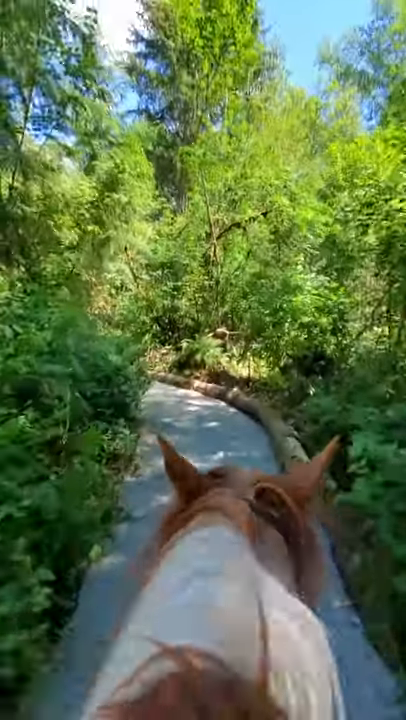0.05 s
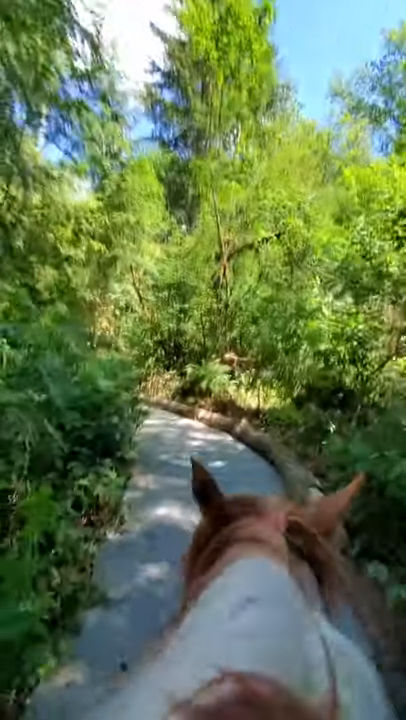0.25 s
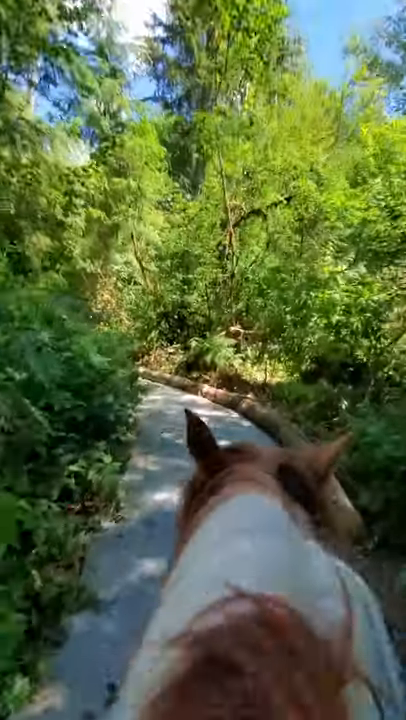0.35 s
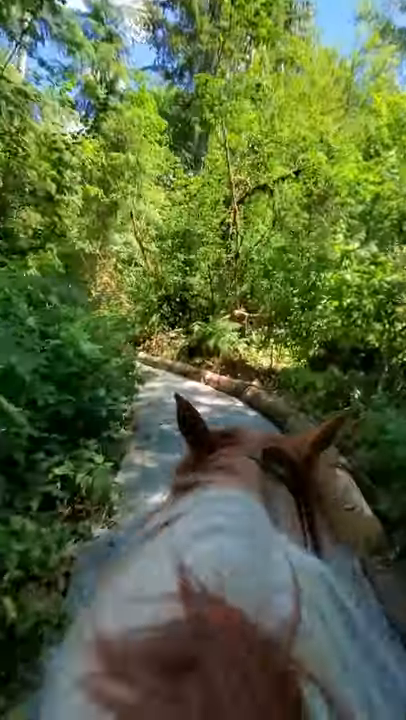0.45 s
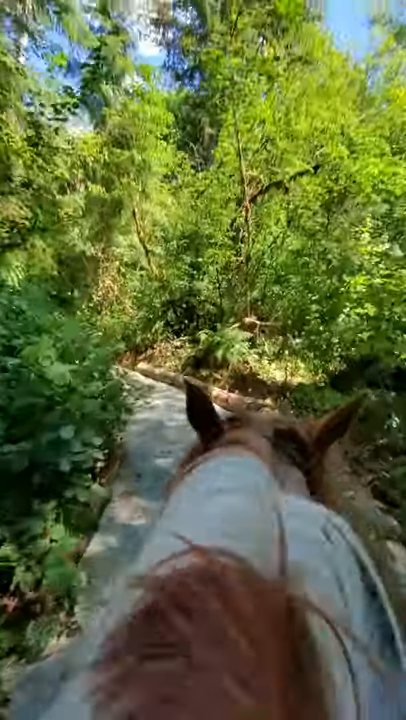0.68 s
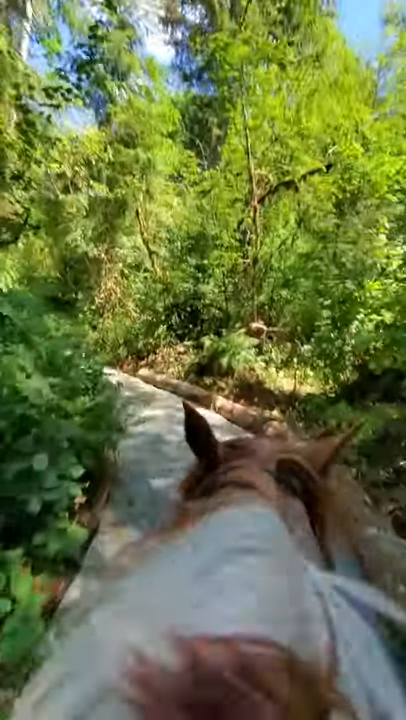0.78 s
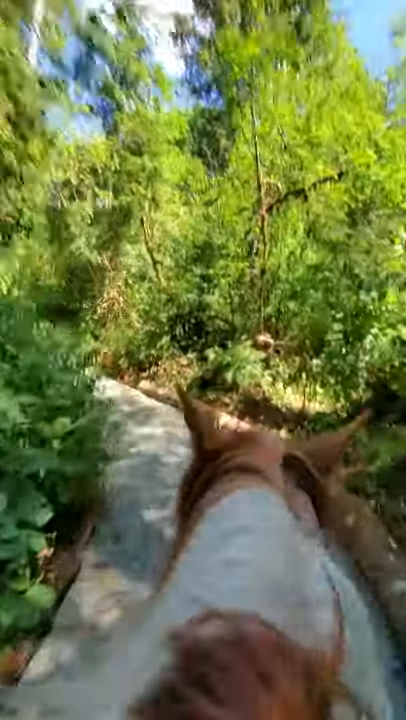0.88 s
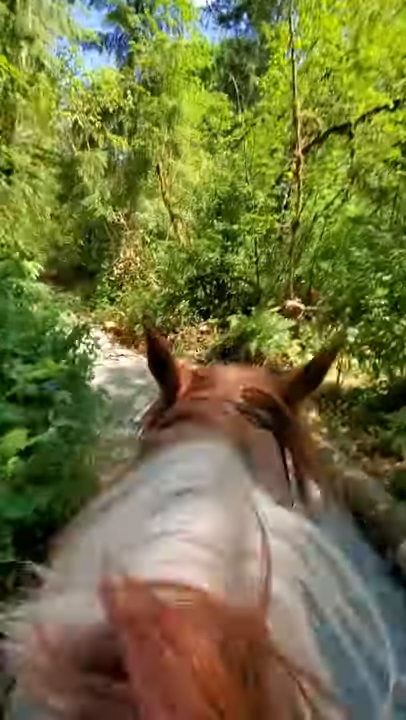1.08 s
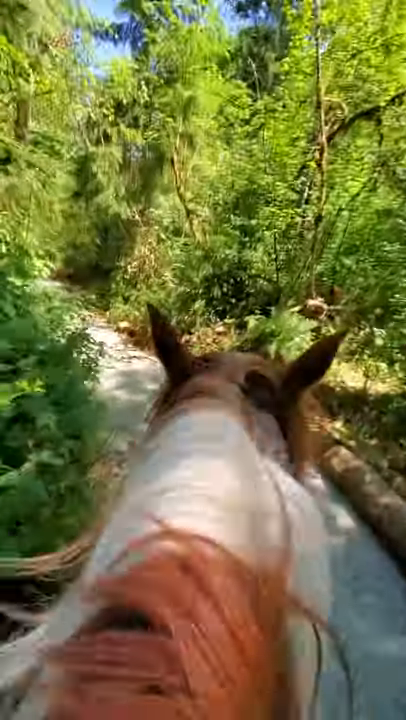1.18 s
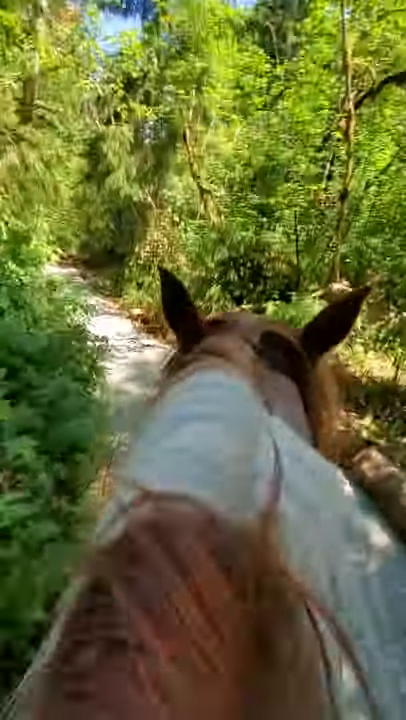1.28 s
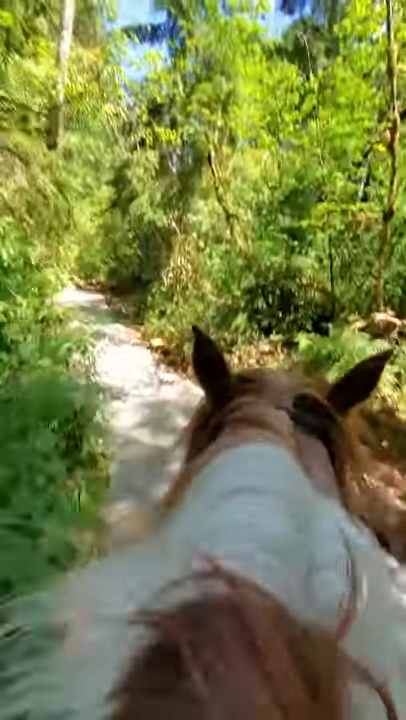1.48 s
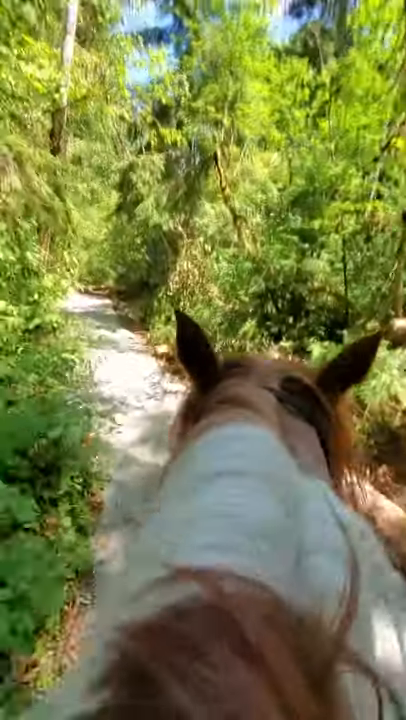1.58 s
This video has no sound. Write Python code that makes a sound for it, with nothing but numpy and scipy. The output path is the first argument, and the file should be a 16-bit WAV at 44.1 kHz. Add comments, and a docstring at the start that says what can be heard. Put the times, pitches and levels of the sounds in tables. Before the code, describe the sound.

A horse walks a gritty forest path with dull, crunching hoofbeats, heard from the saddle. Wind buffets the microphone early on, then rumbles low as the steps continue with sandy scuffs, snapping pebbles and a few tack clicks.

```python
"""Dull, crunching hoofbeats and a hiss of sand: a horse walks a gritty forest path, heard from the saddle.
Each hoof loads the ground, and many tiny grain impacts merge into a burst of noise. Lighter scuffs,
hollow knocks, snapping pebbles, a few tack clicks and faint leather squeaks accompany the steps.
Turbulent wind rumbles and buffets the microphone, mostly on the right, over soft handling rubs
and a faint forest hush."""
import sys
import numpy as np
from scipy import signal
from scipy.fft import rfft, irfft
from scipy.io import wavfile
from scipy.ndimage import uniform_filter1d

SR = 44100
rng = np.random.default_rng(int(sys.argv[2]) if len(sys.argv) > 2 else 0)


def pcm_store(signal):
    """Save signal as 16-bit PCM."""
    levels = np.round(np.clip(np.atleast_2d(signal), -1, 1) * 32767)
    wavfile.write(sys.argv[1], SR, levels.astype(np.int16).T)


N = 72765
T = np.arange(N) / SR

# Hoofbeats, then lighter scuffs as the hooves roll and lift. Each row: peak time in seconds,
# levels of dull body, gravel crunch and sand hiss in dB, rise and fall in seconds.
HOOFBEATS = [(0.104, -34.5, -41, -45.5, 0.012, 0.056), (0.391, -31, -38, -36.5, 0.013, 0.031),
             (0.727, -29, -34.5, -38.5, 0.0072, 0.016), (1.034, -31.5, -35.5, -43, 0.025, 0.023),
             (1.364, -37, -39.5, -42, 0.019, 0.037), (1.645, -36.5, -41, -43, 0.0094, 0.037)]
SCUFFS = [(0.047, -39.5, -48, -62, 0.0035, 0.0099), (0.313, -62, -66, -46, .004, 0.0074),
          (0.16, -36, -40, -62, 0.02, 0.034), (0.240, -50, -47.5, -54.5, 0.023, 0.089),
          (0.354, -44, -39.5, -40.5, 0.0019, 0.02), (0.456, -41, -50, -69, 0.021, 0.02),
          (0.540, -47, -47.5, -55.5, 0.012, 0.075), (0.666, -38.5, -42, -44, 0.0059, 0.004),
          (0.696, -44.5, -47, -39.5, 0.0025, 0.012), (0.708, -41, -42, -35.5, 0.0038, 0.021),
          (0.802, -38.5, -45, -71, 0.008, 0.018), (0.887, -44, -42, -49, 0.014, .018),
          (0.916, -36.5, -43, -56, 0.013, 0.0071), (1.088, -37.5, -49.5, -49, 0.019, 0.031),
          (1.107, -50, -41.5, -41, 0.0073, 0.016), (1.144, -39, -38.5, -37, 0.0044, 0.013),
          (1.294, -40.5, -41.5, -53.5, 0.0033, 0.046), (1.42, -37.5, -46, -48, 0.006, .014),
          (1.441, -51, -41, -43, 0.0047, 0.016), (1.499, -39.5, -44, -39, 0.017, 0.018),
          (1.535, -52.5, -45, -39.5, 0.014, 0.042)]
# Spectra of the three parts of a contact. Each row: frequency in Hz, relative level in dB.
BODY_SPECTRUM = [(90, -27), (190, -4.5), (290, 1), (420, 0), (600, 2.5), (800, 3), (1130, 0.5),
                 (1500, -7.5), (3000, -25.5)]
CRUNCH_SPECTRUM = [(700, -68), (1400, -3), (2100, 0.5), (2600, 1.5), (3400, 1.5), (4300, -3), (5200, -10),
                   (7000, -17), (12000, -55)]
SAND_SPECTRUM = [(2500, -31), (4500, -2), (6200, 2.5), (7500, -2), (10000, 0.5), (13000, 0), (15500, 0)]
# Hoof on packed earth. Each row: start in seconds, level in dB, pitch in Hz, decay in seconds.
KNOCKS = [(0.914, -24, 215, 0.0034), (1.021, -27.5, 346, 0.0033), (1.033, -19, 232, 0.0032),
          (1.066, -32, 530, .007), (1.0812, -32.5, 529, 0.0098), (1.168, -34, 450, 0.0053),
          (1.352, -27.5, 267, 0.0047), (1.487, -22, 327, 0.0034), (1.499, -30, 338, 0.0052),
          (1.545, -40.5, 384, 0.0083)]
# Pebbles snapping underfoot. Each row: start in seconds, level in dB.
PEBBLE_SNAPS = [(0.172, -29.5), (0.349, -35), (0.4552, -29), (0.7175, -31), (0.73, -21.5), (0.7756, -25),
                (0.8501, -28.5), (0.959, -34), (1.286, -42)]
# Spectrum of a snap. Each row: frequency in Hz, relative level in dB.
PEBBLE_SPECTRUM = [(250, 1), (700, 8), (1200, -23), (2100, 8), (3600, -10), (5500, -21), (12000, -35)]
# Hard grains under the heaviest hoof. Each row: start in seconds, level in dB, pitch in Hz.
CHINKS = [(0.721, -24.5, 3650), (0.729, -23, 3980)]
# Clicks of tack. Each row: peak time in seconds, left and right levels in dB.
TACK_CLICKS = [(0.959, -5, -32), (1.137, -25, -37), (1.5394, -22.5, -39), (1.6250, -26.5, -53)]
# Faint, high, rising squeaks of leather.
# Each row: peak time in seconds, level in dB, pitch in Hz, half length in seconds.
LEATHER_SQUEAKS = [(0.052, -58, 9050, .011), (0.053, -57, 12400, .007), (0.084, -54, 10000, 0.01),
                   (0.089, -46, 12600, 0.012), (0.097, -48, 15150, 0.013)]
# Air striking the microphone. Each row: centre in seconds, left and right levels in dB, pitch in Hz.
BUFFETS = [(0.214, -50, -14.5, 146), (0.239, -51, -16.5, 155), (0.256, -46, -15, 196),
           (0.266, -39, -11.5, 126), (0.2962, -32, -4.5, 192), (0.338, -45, -19, 132),
           (0.39, -44, -15.5, 228), (0.499, -59, -31, 138), (0.542, -51, -26, 214),
           (0.6555, -17.5, -62, 222), (0.7378, -20, -49, 263), (1.159, -53, -27, 105),
           (1.374, -46, -19, 77), (1.405, -57, -24, 74)]
# Wind strength at each microphone. Each row: time in seconds, level in dB.
GUSTS_LEFT = [(0, -61), (.18, -37), (.38, -46.5), (.55, -55), (.63, -39.5), (.66, -38), (.78, -46),
              (.87, -49.5), (1.12, -53), (1.21, -57), (1.37, -39), (1.54, -57), (1.65, -46)]
GUSTS_RIGHT = [(0, -36.5), (.08, -29.5), (.195, -32.5), (0.221, -18), (.30, -11), (.345, -19),
               (0.401, -20.5), (.43, -31.5), (.50, -26.5), (0.649, -33.5), (.78, -31.5), (.86, -41.5),
               (0.954, -24), (1.04, -31.5), (1.22, -41), (1.325, -30.5), (1.378, -31), (1.44, -33),
               (1.56, -39), (1.62, -31.5), (1.65, -28)]
# Handling rubs. Each row: peak time in seconds, level in dB, half length in seconds.
RUBS = [(0.045, -40, 0.0078), (0.083, -33, 0.014), (0.887, -39, 0.014), (0.997, -40.5, 0.025),
        (1.433, -52, 0.013)]
# Forest hush and settling grit. Each row: time in seconds, level in dB.
HUSH_LEVEL = [(0, -46), (.33, -46.5), (.54, -45.5), (.625, -50.5), (.80, -46), (1.15, -47), (1.26, -50),
              (1.40, -47), (1.59, -55), (1.65, -37)]
# Spectra of the wind, rubs and hush. Each row: frequency in Hz, relative level in dB.
WIND_SPECTRUM = [(20, -66), (40, -6.5), (70, 2), (120, -7), (170, -13), (260, -20), (400, -34.5),
                 (650, -40.5), (1500, -87)]
RUB_SPECTRUM = [(250, 4), (700, 12), (1300, -5), (2100, 2), (3300, -6.5), (4800, -21), (6500, -18),
                (8100, -36), (11000, -23), (15500, -26)]
HUSH_SPECTRUM = [(40, -6), (200, -6.5), (450, 0), (900, -5.5), (1600, -2), (3400, -6.5), (5200, -12),
                 (8000, -18.5), (15500, -15.5)]
# The right microphone against the left. Each row: frequency in Hz, gain in dB.
RIGHT_GAIN = [(150, 7), (300, 1), (500, 0.5), (1200, -2.5), (2000, -5.5), (3300, -10.5), (4500, -16.5),
              (6300, -14), (8100, -26), (10500, -15.5), (15500, -17)]
# Likeness of the two channels. Each row: frequency in Hz, correlation coefficient.
CORRELATION = [(150, 0.48), (450, 0.8), (740, 0.53), (1200, -0.37), (2000, -0.44), (3300, 0.26),
               (5500, -0.12)]


def hooves(settle_db=(-10.5, -7.5, -9.5), settle_s=0.068):
    """Incoherent contacts add in power: each swells under load, dies quickly and leaves settling grit."""
    power = np.zeros((3, N))
    for peak, body_db, crunch_db, sand_db, rise, fall in HOOFBEATS + SCUFFS:
        before, after = np.maximum(peak - T, 0), np.maximum(T - peak, 0)
        press = np.exp(-(before / (2 * rise)) ** 2)
        settling = amp(settle_db)[:, None] ** 2 * np.exp(-2 * after / settle_s)
        release = np.exp(-2 * after / fall) + settling
        power += amp([[body_db], [crunch_db], [sand_db]]) ** 2 * press ** 2 * release
    body, crunch, sand = np.sqrt(power)
    return (body * grit(BODY_SPECTRUM, smooth_db=-2.5)
            + crunch * grit(CRUNCH_SPECTRUM, smooth_db=1.0)
            + sand * grit(SAND_SPECTRUM, smooth_db=0.5))


def grit(spectrum, smooth_db, grains_per_s=2600, spread_db=3.5):
    """Random impacts of unequal size form shot noise, laid over the smooth noise of friction."""
    sizes = amp(spread_db * np.minimum(rng.exponential(1, N), 4))
    struck = rng.random(N) < grains_per_s / SR
    grains = unit(sizes * struck * rng.choice([-1, 1], (2, N)))
    return colour(grains + amp(smooth_db) * rng.standard_normal((2, N)), spectrum)


def knocks():
    """A hoof striking packed earth excites one heavily damped low resonance, louder on the right."""
    hollow = sum(amp(db) * ring(start, hz, decay) for start, db, hz, decay in KNOCKS)
    return hollow * amp([[-4], [6.5]])


def pebbles(rise_s=0.00023, decay_s=0.0022):
    """Stone meets stone so briefly that the energy spreads over a wide band."""
    level = sum(amp(db) * np.clip((T - start) / rise_s, 0, 1) * np.exp(-abs(T - start) / decay_s)
                for start, db in PEBBLE_SNAPS)
    return level * noise(PEBBLE_SPECTRUM)


def chinks():
    """Crushed grains, small and stiff, vibrate briefly in the treble, mostly on the left."""
    ringing = sum(amp(db) * ring(start, hz, decay_s=0.002) for start, db, hz in CHINKS)
    return ringing * amp([[0], [-14]])


def tack_clicks(centre_hz=3674, bandwidth_hz=1800, half_length_s=0.00067):
    """Each dry click is a wave packet, confined to one treble band by its tapered sinc envelope."""
    out = np.zeros((2, N))
    for peak, left_db, right_db in TACK_CLICKS:
        t = T - peak
        envelope = np.sinc(bandwidth_hz * t) * gaussian(peak, half_length_s)
        out += amp([[left_db], [right_db]]) * envelope * np.cos(2 * np.pi * centre_hz * t)
    return out


def leather_squeaks(bandwidth_hz=690, glide_hz_per_s=5800):
    """Leather squeaks faintly on the left: random modulation widens each rising tone to a narrow band."""
    out = np.zeros(N)
    band = np.exp(-(2 * np.fft.fftfreq(N, 1 / SR) / bandwidth_hz) ** 2)
    for peak, db, hz, half_length in LEATHER_SQUEAKS:
        flutter = np.fft.ifft(band * np.exp(2j * np.pi * rng.random(N)))
        cycles = np.cumsum(hz + glide_hz_per_s * (T - peak)) / SR
        tone = unit((flutter * np.exp(2j * np.pi * cycles)).real)
        out += amp(db) * gaussian(peak, half_length) * tone
    return out * amp([[0], [-18]])


def buffets(boom_hz=80.5, boom_q=4.2, boom_db=4):
    """Each buffet is one compression and rarefaction, which drives a low resonance into a short boom."""
    pressure = np.zeros((2, N))
    for centre, left_db, right_db, hz in BUFFETS:
        phase = 2 * np.pi * hz * (T - centre)
        pressure -= amp([[left_db], [right_db]]) * phase * np.exp((1 - phase ** 2) / 2)
    boom = signal.lfilter(*signal.iirpeak(boom_hz, boom_q, fs=SR), pressure)
    return pressure + amp(boom_db) * boom


def wind():
    """Turbulence is local, so each microphone has an independent rumble whose level follows the gusts."""
    eddies = noise(WIND_SPECTRUM)
    local_power = uniform_filter1d(eddies ** 2, size=1800, axis=1)
    steady_rumble = eddies / np.sqrt(local_power + 0.05)
    gust_db = [np.interp(T, *np.transpose(gusts)) for gusts in (GUSTS_LEFT, GUSTS_RIGHT)]
    return steady_rumble * amp(gust_db)


def handling():
    """Friction close to the right microphone gives short, soft swells of noise."""
    level = sum(amp(db) * gaussian(peak, half_length) for peak, db, half_length in RUBS)
    return level * noise(RUB_SPECTRUM) * amp([[-9], [0]])


def forest():
    """Slow amplitude modulation makes a faint broadband hush swell and sink."""
    return amp(np.interp(T, *np.transpose(HUSH_LEVEL))) * noise(HUSH_SPECTRUM)


def at_microphones(pair):
    """One sound field reaches two microphones partly correlated, and duller on the right."""
    left, independent = rfft(pair)
    correlation = np.clip(per_bin(CORRELATION), -1, 1)
    right = correlation * left + np.sqrt(1 - correlation ** 2) * independent
    return irfft(np.array([left, right * amp(per_bin(RIGHT_GAIN))]), N)


def ring(start, hz, decay_s, rise_s=0.00026):
    """A struck, damped oscillator vibrates as an exponentially decaying sine."""
    t = np.maximum(T - start, 0)
    return (1 - np.exp(-t / rise_s)) * np.exp(-t / decay_s) * np.sin(2 * np.pi * hz * t)


def gaussian(peak, half_length):
    """A bell-shaped envelope whose standard deviation is half_length seconds."""
    return np.exp(-((T - peak) / half_length) ** 2 / 2)


def noise(spectrum):
    """Filtered white noise takes the filter's spectrum; the two channels are independent."""
    return colour(rng.standard_normal((2, N)), spectrum)


def colour(x, spectrum):
    """Multiplication in frequency filters x; the result has rms 1."""
    return unit(irfft(rfft(x) * amp(per_bin(spectrum)), N))


def per_bin(points):
    """Interpolation in log frequency gives a table's value at every bin."""
    hz, value = np.transpose(points)
    return np.interp(np.log(np.fft.rfftfreq(N, 1 / SR) + 1), np.log(hz), value)


def unit(x):
    """Normalisation brings each channel to rms 1."""
    return x / np.sqrt(np.mean(x ** 2, -1, keepdims=True) + 1e-20)


def amp(db):
    """Amplitude grows tenfold for every 20 dB."""
    return 10 ** (np.asarray(db) / 20)


def scene():
    """Pressures superpose: hooves, tack and forest, with wind and handling at the microphone."""
    ground = at_microphones(hooves() + pebbles() + forest()) + knocks() + chinks()
    return ground + tack_clicks() + leather_squeaks() + handling() + wind() + buffets()


def record(dry):
    """A linear-phase low-pass filter limits the bandwidth to 15.9 kHz."""
    low_pass = signal.firwin(1023, 15900, window=("kaiser", 9), fs=SR)
    return signal.oaconvolve(dry, low_pass[None], "same")


dry = scene()
out = record(dry)
pcm_store(out)
```